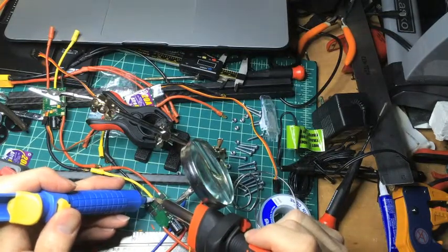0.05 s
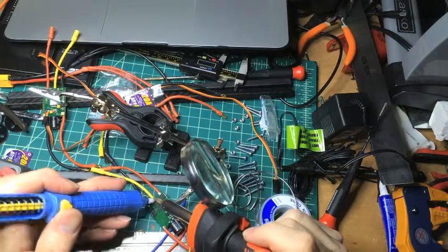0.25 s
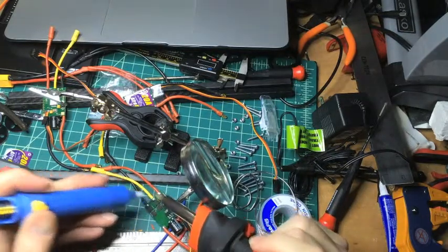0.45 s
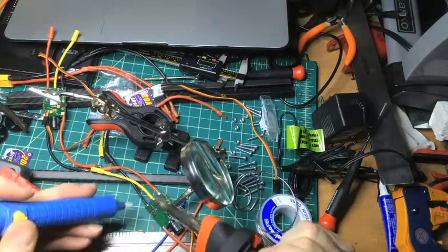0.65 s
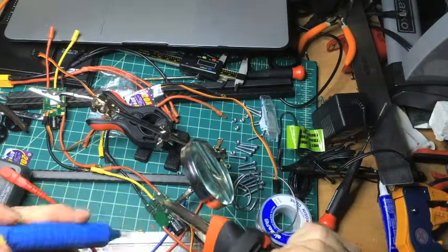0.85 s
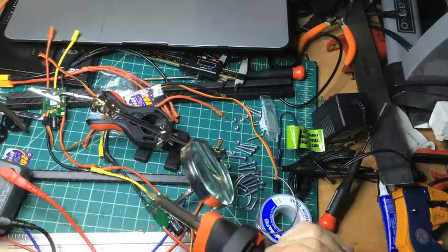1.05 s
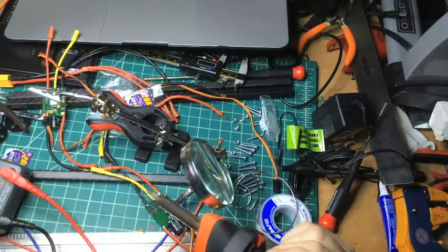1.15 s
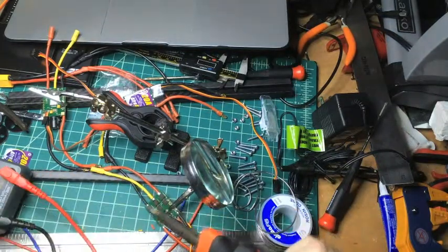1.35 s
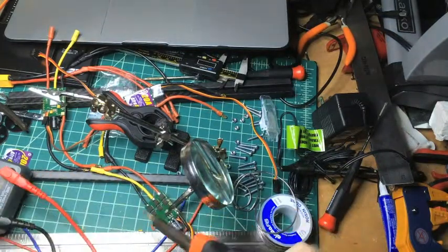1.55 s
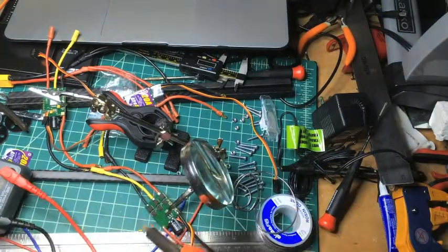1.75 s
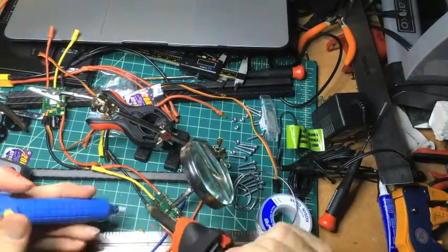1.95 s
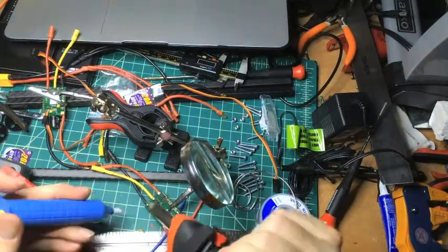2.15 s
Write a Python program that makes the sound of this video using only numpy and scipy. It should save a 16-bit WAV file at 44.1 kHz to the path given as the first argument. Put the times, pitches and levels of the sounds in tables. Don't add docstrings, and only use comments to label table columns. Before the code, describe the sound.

Sharp metallic-plastic snap of a solder pump close by, brief rattle and ring, low fan humming.

```python
import sys
import numpy as np
from scipy import signal
from scipy.fft import rfft, irfft
from scipy.io import wavfile
from scipy.ndimage import uniform_filter1d

SR = 44100
rng = np.random.default_rng(int(sys.argv[2]) if len(sys.argv) > 2 else 0)


def master(y):
    cut = np.clip(np.atleast_2d(y).T, -1, 1)
    pcm = np.round(cut * 32767)
    wavfile.write(sys.argv[1], SR, pcm.astype(np.int16))


def voltage_ratio(decibels):
    exponent = np.asarray(decibels, float) / 20
    return 10 ** exponent


N = 97020

# (time [s], peak level [dB], burst decay [s])
PISTON_BLOWS = [(.2000, -60, .0007), (.2058, -43, .002), (.2095, -48, .0015), (.2180, -50, .002),
                (.2255, -50, .002), (.2288, -24, .001), (.2292, -14, .0008), (.2297, -11, .0005),
                (.2300, -11.5, .0009), (.2316, -20, .002), (.2330, -19, .0015), (.2352, -23, .002),
                (.2380, -22, .003), (.2407, -9.5, .0006), (.2416, -18, .003), (.2440, -19, .003),
                (.2465, -19, .003), (.2490, -19, .002), (.2510, -25, .003), (.2545, -28, .003),
                (.2580, -29, .003), (.2625, -32, .003)]
# (frequency [Hz], level [dB per Hz])
MAT_COLOUR = [(1500, -29.5), (2800, -8), (3600, -2), (5500, -4.5), (7000, -6), (10500, -4), (14800, -6),
              (15600, -21)]


def evened(x):
    return x / np.sqrt(np.mean(x ** 2) + 1e-20)


def smooth_noise(shape, *sizes):
    x = rng.standard_normal(shape)
    for size, axis in sizes:
        x = uniform_filter1d(x, size=size, axis=axis)
    return evened(x)


def read(points, hz):
    f, value = np.transpose(points)
    return np.interp(np.log(hz + 1), np.log(f + 1), value)


def curve(points):
    s, db = np.transpose(points)
    return voltage_ratio(np.interp(np.arange(N) / SR, s, db))


def add(mix, s, sound):
    part = mix[round(s * SR):][:len(sound)]
    part += sound[:len(part)]


def colour(x, points):
    hz = np.linspace(0, SR / 2, 1025)
    gain = voltage_ratio(read(points, hz)) * np.minimum(hz / points[0][0], 1) ** 2 * (hz < SR / 2)
    taps = signal.minimum_phase(signal.firwin2(2047, hz, gain ** 2 + 1e-9, fs=SR))
    return signal.oaconvolve(x, taps / np.linalg.norm(taps))[:len(x)]


def resonate(x, hz, width):
    r = np.exp(-np.pi * width / SR)
    return 2 * signal.lfilter([1 - r], [1, -r * np.exp(2j * np.pi * hz / SR)], x).real


def body(x, peaks):
    return sum(voltage_ratio(db) * resonate(resonate(x, hz, w), hz, w) for hz, w, db in peaks)


def lift(x, peaks):
    hz = np.fft.rfftfreq(len(x), 1 / SR)
    extra = sum((voltage_ratio(db) / (1 + (2 * (hz - f) / w) ** 2)) ** 2 for f, w, db in peaks)
    return irfft(rfft(x) * np.sqrt(1 + extra), len(x))


def sweep(x, hz, width):
    turn = np.exp(2j * np.pi * np.cumsum(hz) / SR)
    r = np.exp(-np.pi * width / SR)
    low = x / turn
    for _ in range(2):
        low = signal.lfilter([1 - r], [1, -r], low)
    return 2 * (turn * low).real


def grains(share, spread_db):
    u, e, z = rng.random(N), rng.exponential(1, N), rng.standard_normal(N)
    return evened((u < share) * z * voltage_ratio(spread_db * np.minimum(e, 4)))


def rub(level, tone):
    return curve(level) * evened(body(grains(.4, 1.5), tone))


def small_contacts(contacts):
    out, t = np.zeros(N), np.arange(3000) / SR
    for s, db, hz, t60 in contacts:
        puff = .3 * colour(rng.standard_normal(3000) * np.exp(-t / .001), MAT_COLOUR)
        rough = evened(body(rng.standard_normal(3000), [(hz, 20 / t60, 0)]))
        ringing = voltage_ratio(-60 * t / t60) * (np.sin(2 * np.pi * hz * t) + .6 * rough)
        add(out, s, voltage_ratio(db) * (ringing * np.minimum(t / .002, 1) + puff))
    return out


def fan():
    # (frequency [Hz], level [dB per Hz])
    air = [(15, -55.5), (30, -20.5), (49, -11), (151, -14.5), (240, -12), (293, -20.5), (427, -17.5),
           (4500, -49.5), (9000, -58.5)]
    # (frequency [Hz], width [Hz], level [dB])
    hum = [(59.2, 1.6, -55), (129, 3, -63), (204.6, 4, -59), (238, 5, -63), (102, 10, -66), (172, 8, -70),
           (425, 10, -74), (479, 3.3, -75)]
    # (time [s], level [dB])
    load = [(0, 4), (.3, -6), (.5, -3), (.7, 1.5), (1.2, 2.5), (1.3, -1), (1.65, -0.5), (1.9, -2), (2.2, 1)]
    air_db, waver_db = -53.5, 1.5
    hz, _, z = signal.stft(rng.standard_normal(N + 4096), SR, nperseg=2048, noverlap=1536)
    patches = smooth_noise(z.shape, (9, 0), (6, 1))
    z = z * voltage_ratio(read(air, hz)[:, None] + 0.79 * patches)
    wash = signal.istft(z, SR, nperseg=2048, noverlap=1536)[1][:N]
    tones = np.zeros(N)
    for f, w, db in hum[4:]:
        tones += voltage_ratio(db) * evened(body(rng.standard_normal(N + SR), [(f, w, 0)])[SR:])
    for f, w, db in hum[:4]:
        waver = smooth_noise((2, N), (2000, -1), (2000, -1))
        phase = 2 * np.pi * np.cumsum(f + .3 * w * waver[1]) / SR
        tones += voltage_ratio(db + waver_db * waver[0]) * np.sqrt(2) * np.sin(phase)
    return voltage_ratio(air_db) * evened(wash) + curve(load) * tones


def piston_blows():
    # (frequency [Hz], level [dB per Hz])
    crack = [(400, -18), (1200, -12.5), (2600, -9), (4200, -12.5), (6700, -8), (10000, -7.5), (15000, -9.5),
             (16500, -14.5)]
    # (frequency [Hz], width [Hz], level [dB])
    barrel = [(2350, 600, -5), (3130, 240, 3), (3650, 300, -5), (5800, 900, -6), (6800, 600, -2),
              (9700, 500, 0)]
    crack_db, click_size = 4.5, 1.8
    rattle_s, rattle_hz = .237, 2900
    t = np.arange(2000) / SR
    drive = rng.choice([-1., 1.], N) * rng.uniform(.4, 1.5, N)
    power, clicks = np.zeros(N), np.zeros(N)
    for s, db, decay in PISTON_BLOWS:
        add(power, s, (voltage_ratio(db) * np.minimum(t / 0.00024, 1) * np.exp(-t / decay)) ** 2)
        add(clicks, s + .0001, [click_size * voltage_ratio(db)])
    hits = (np.sqrt(power) * drive + clicks) * voltage_ratio(crack_db)
    thin = signal.sosfilt(signal.butter(2, rattle_hz, 'high', fs=SR, output='sos'), hits)
    hits = np.where(np.arange(N) < rattle_s * SR, hits, thin)
    return colour(hits + body(hits, barrel), crack)


def room_tail():
    # (frequency [Hz], t60 [s])
    die_away = [(300, .25), (1200, 0.73), (3000, 0.78), (6000, 0.77), (9000, 0.6), (12000, 0.58),
                (15000, 0.38)]
    # (frequency [Hz], level [dB per Hz])
    ring = [(300, -19), (860, -22), (2200, -23.5), (3900, -17.5), (4600, -18.5), (7000, -15),
            (11000, -13.5), (15500, -16)]
    # (frequency [Hz], width [Hz], level [dB])
    ring_peaks = [(2460, 350, 4), (3120, 560, 13.5), (5036, 130, 3), (5700, 1000, 9.8), (7180, 700, 3)]
    room_db, flicker_db = -26.5, 1.0
    hz, frame_s, z = signal.stft(rng.standard_normal(N), SR, nperseg=256, noverlap=192)
    t60 = read(die_away, hz)[:, None]
    power = np.zeros(z.shape)
    for s, db, decay in PISTON_BLOWS:
        age = np.maximum(frame_s - s, 0)
        power += decay * voltage_ratio(2 * (db - 60 * age / t60)) * np.minimum(age / 0.0035, 1) ** 2
    flicker = smooth_noise(z.shape, (3, 0), (14, 1))
    z = z * np.sqrt(power / power.max()) * voltage_ratio(flicker_db * flicker)
    tail = signal.istft(z, SR, nperseg=256, noverlap=192)[1][:N]
    return voltage_ratio(room_db) * colour(lift(tail, ring_peaks), ring)


def whistle():
    # (start [s], end [s], frequency [Hz], width [Hz], level [dB])
    start, end, hz, width, db = (.208, .229, 3150, 450, -44)
    t = np.arange(N) / SR
    swell = np.clip((t - start) / (end - start), 0, 1) ** 1.1 * (t < end)
    breath = evened(body(rng.standard_normal(N), [(hz, width, 0)]))
    return voltage_ratio(db) * swell * (np.sin(2 * np.pi * hz * t) + 0.17 * breath)


def recoil():
    # (time [s], peak level [dB], sign [+1 or -1], width [s])
    pushes = [
        (.211, -37, 1, .003),
        (.2190, -30, -1, .002),
        (.2216, -26, -1, .0012),
        (.2301, -16.5, 1, .0008),
        (.2330, -26, -1, .001),
        (.2355, -28, -1, .002),
        (.2455, -31, 1, .002),
    ]
    t = np.arange(N) / SR
    return sum(sign * voltage_ratio(db) * np.exp(-.5 * ((t - s) / w) ** 2) for s, db, sign, w in pushes)


def bench_knocks():
    # (time [s], frequency [Hz], t60 [s], level [dB])
    knocks = [(.252, 95, .12, -35), (.416, 720, .06, -48), (.229, 180, .06, -31), (.229, 420, .03, -29),
              (.233, 580, .03, -29), (.232, 730, .03, -29), (.2345, 880, .03, -28), (.242, 1000, .04, -36),
              (.233, 1150, .025, -31), (.250, 1400, .05, -39), (.229, 1600, .03, -29),
              (.238, 1930, .03, -35)]
    out, t = np.zeros(N), np.arange(9000) / SR
    for s, hz, t60, db in knocks:
        add(out, s, voltage_ratio(db - 60 * t / t60) * np.sin(2 * np.pi * hz * t) * np.minimum(t * hz, 1))
    return out


def spring():
    # (time [s], peak level [dB], frequency [Hz], t60 [s])
    shivers = [(.277, -44, 3000, .08), (.296, -41, 3130, .1), (.315, -44, 3300, .08), (.332, -43, 3120, .1),
               (.36, -47, 2950, .1), (.385, -49, 3200, .1), (.281, -41, 5800, .06), (.43, -52, 3250, .08),
               (.535, -54, 3050, .1), (.55, -57, 2900, .08), (.582, -59, 3250, .1), (.545, -59, 5600, .1),
               (.592, -57, 5800, .1), (.612, -59, 5900, .1), (.628, -61, 3100, .1)]
    return small_contacts(shivers)


def sleeve():
    # (time [s], level [dB])
    slide = [(.6, -73), (.72, -69), (.82, -64), (1.0, -64), (1.2, -65), (1.27, -73.5), (1.32, -91),
             (1.65, -84), (1.79, -75.5), (1.925, -66), (1.94, -88), (2.2, -97)]
    # (frequency [Hz], width [Hz], level [dB])
    cloth = [(1600, 1100, 0), (3000, 2000, -9), (4000, 1200, -12), (6500, 3000, -15)]
    # (time [s], frequency [Hz])
    fold_pitch = [(.68, 930), (.81, 1310), (1.19, 1330), (1.3, 1150), (1.7, 1450), (1.93, 1380)]
    fold_width_hz, fold_db = 130, -4
    hz = np.interp(np.arange(N) / SR, *np.transpose(fold_pitch))
    fold = sweep(grains(0.47, 1.0), hz, fold_width_hz)
    return rub(slide, cloth) + voltage_ratio(fold_db) * curve(slide) * evened(fold)


def tool_ticks():
    # (time [s], peak level [dB], frequency [Hz], t60 [s])
    ticks = [(.925, -58, 7000, .008), (.988, -47, 12700, .02), (.994, -58, 4200, .05),
             (1.018, -41, 5400, .03), (1.028, -54, 5150, .035), (1.040, -62, 5600, .04),
             (1.021, -47, 5200, .02), (1.110, -60, 3700, .04), (1.123, -53, 12000, .006),
             (1.165, -66, 3950, .04), (1.177, -54, 12000, .006), (1.189, -62, 12000, .006),
             (1.430, -60, 7500, .006), (1.530, -57, 8000, .006), (1.635, -59, 8000, .006),
             (1.737, -59, 8000, .006), (1.8375, -58, 8500, .006)]
    return small_contacts(ticks)


def hand_scrapes():
    # (start [s], rise [s], hold [s], fall [s], level [dB])
    strokes = [
        (.965, .008, .012, .005, -67),
        (.986, .002, .043, .003, -55),
        (1.032, .003, .013, .004, -66),
        (1.150, .012, .017, .001, -62),
        (1.387, .001, .003, .002, -68),
        (1.395, .008, .018, .01, -71),
        (1.597, .006, .013, .003, -68),
    ]
    t, size = np.arange(N) / SR, np.zeros(N)
    for s, rise, hold, fall, db in strokes:
        fading = np.exp(-np.maximum(t - s - rise - hold, 0) / fall)
        size += voltage_ratio(db) * np.clip((t - s) / rise, 0, 1) ** 2 * fading
    clumps = voltage_ratio(2.5 * smooth_noise(N, (90, -1)))
    return size * evened(colour(clumps * grains(0.26, 1.9), MAT_COLOUR))


def wire_squeal():
    # (time [s], level [dB])
    squeal = [(1.64, -100), (1.73, -79), (1.91, -76), (2.0, -100), (2.2, -110)]
    # (frequency [Hz], width [Hz], level [dB])
    squeal_tone = [(6800, 300, -1), (7400, 300, -1), (8200, 1500, -8), (9400, 250, 0), (4100, 300, -2)]
    return rub(squeal, squeal_tone)


def pump_drag():
    # (time [s], level [dB])
    drag = [(1.92, -94), (1.923, -62), (1.94, -62.5), (2.04, -64.5), (2.06, -65), (2.15, -70.5),
            (2.2, -76.5)]
    grit = [(1.92, -98.5), (1.923, -68), (1.94, -69), (2.03, -67), (2.07, -75), (2.2, -84)]
    # (frequency [Hz], width [Hz], level [dB])
    drag_tone = [(2400, 500, 0), (2810, 300, 1), (3400, 1400, -1), (4000, 600, -3), (4700, 800, -6)]
    grit_tone = [(6340, 2300, 2), (7300, 1400, 1.5), (11000, 5000, -11)]
    # (time [s], peak level [dB], frequency [Hz], t60 [s])
    catches = [(1.924, -63, 2850, .05), (1.924, -65, 3950, .05), (1.937, -63, 2800, .07),
               (1.958, -62, 2800, .09), (1.982, -65, 2400, .08), (2.002, -63, 3680, .06),
               (2.036, -65, 2800, .07), (2.075, -68, 3450, .08), (2.086, -66, 4050, .09),
               (1.842, -63, 1100, .06), (1.805, -66, 1350, .05)]
    return rub(drag, drag_tone) + rub(grit, grit_tone) + small_contacts(catches)


def scene():
    shot = piston_blows() + room_tail() + whistle() + recoil() + bench_knocks() + spring()
    handling = sleeve() + tool_ticks() + hand_scrapes() + wire_squeal() + pump_drag()
    return (fan() + shot + handling)[None]


def band_limit(x):
    return signal.sosfilt(signal.butter(12, 16590, fs=SR, output="sos"), x)


def record(dry):
    # (time [s], level [dB])
    gain = [(0, -5.5), (.03, -2), (.232, -1.5), (.26, -5), (.45, -7.5), (.57, -2), (.68, -0.5), (2.2, -0.5)]
    hiss_db, edge_hz, leak_db = -75, 15280, -31
    heard = (dry + voltage_ratio(hiss_db) * rng.standard_normal(dry.shape)) * curve(gain)
    kept = signal.oaconvolve(heard, signal.firwin(801, edge_hz, fs=SR)[None], "same")
    return band_limit(kept + voltage_ratio(leak_db) * (heard - kept))


dry = scene()
out = record(dry)
master(out)
```